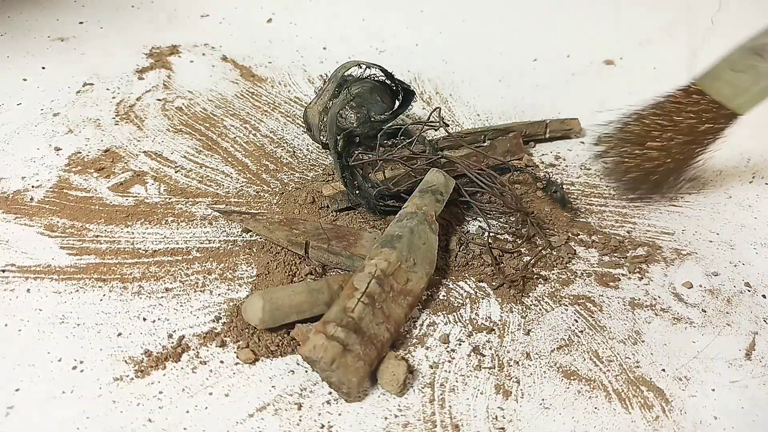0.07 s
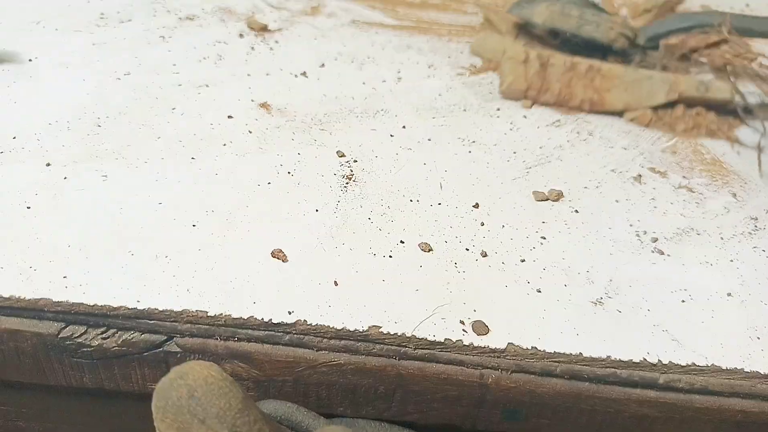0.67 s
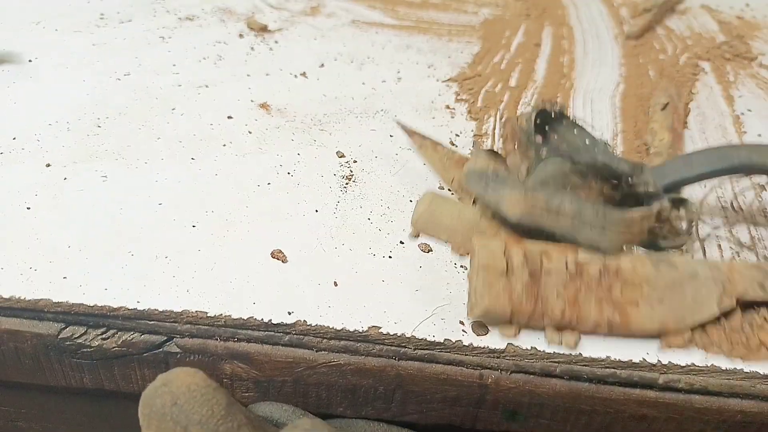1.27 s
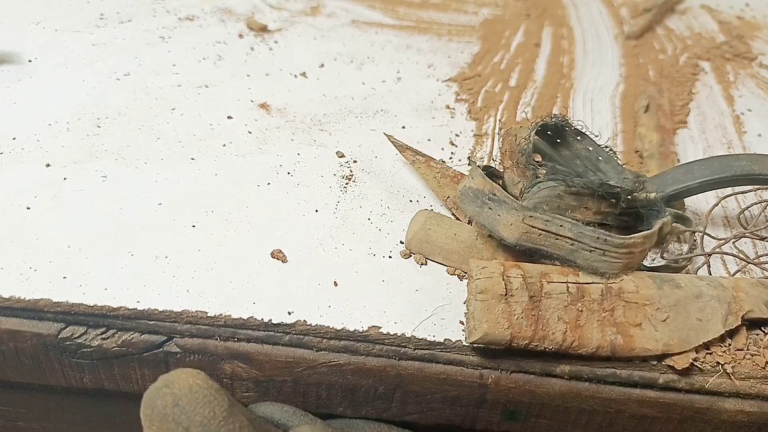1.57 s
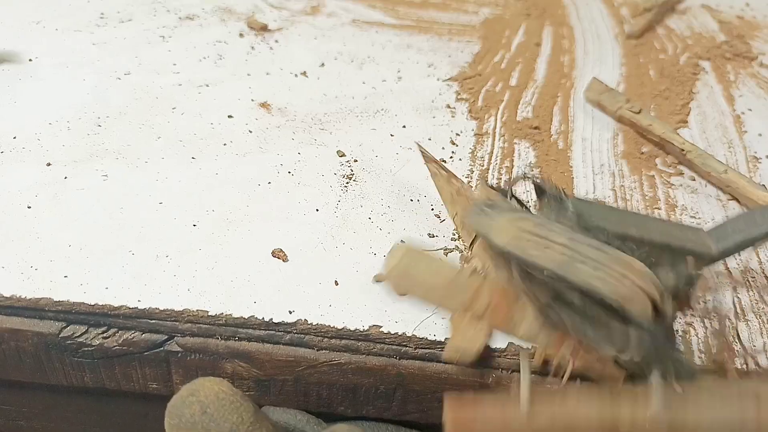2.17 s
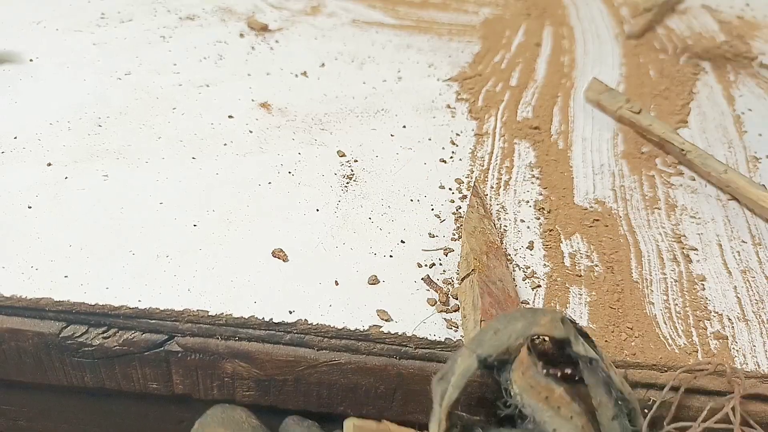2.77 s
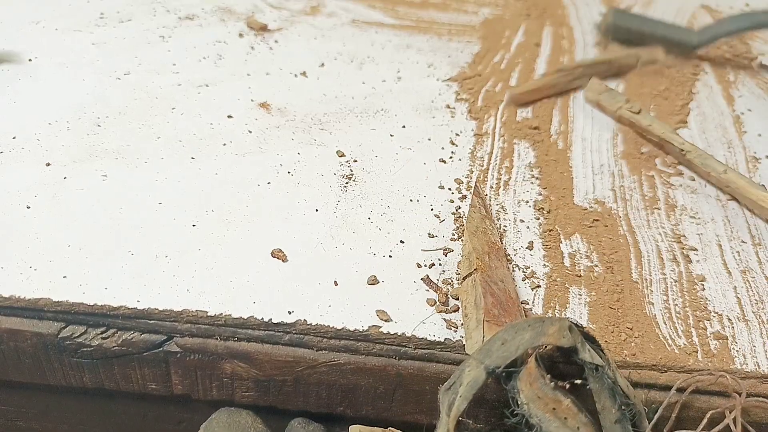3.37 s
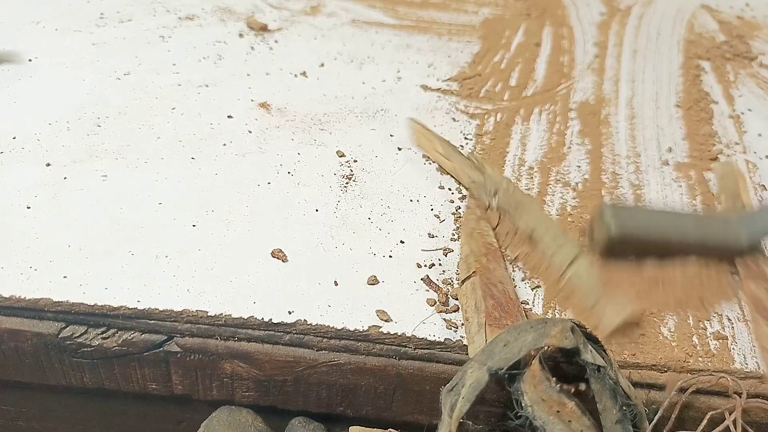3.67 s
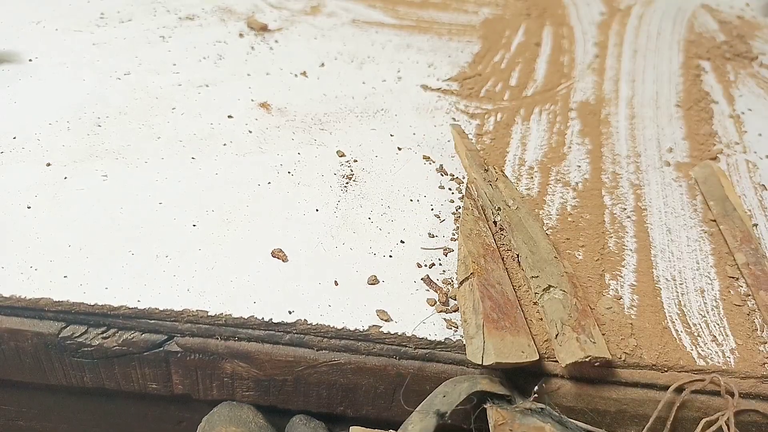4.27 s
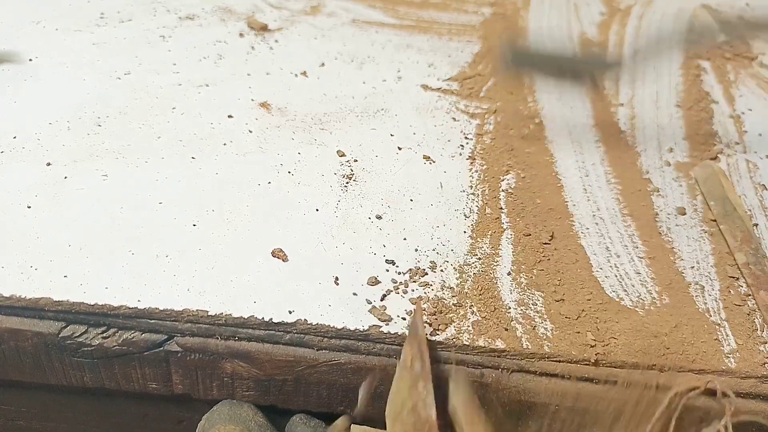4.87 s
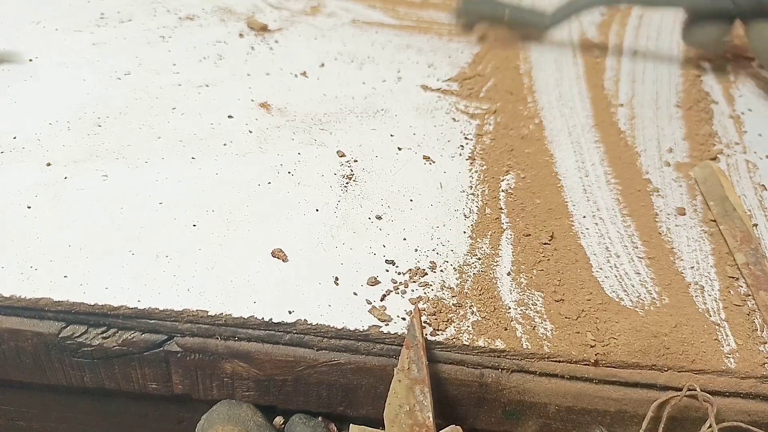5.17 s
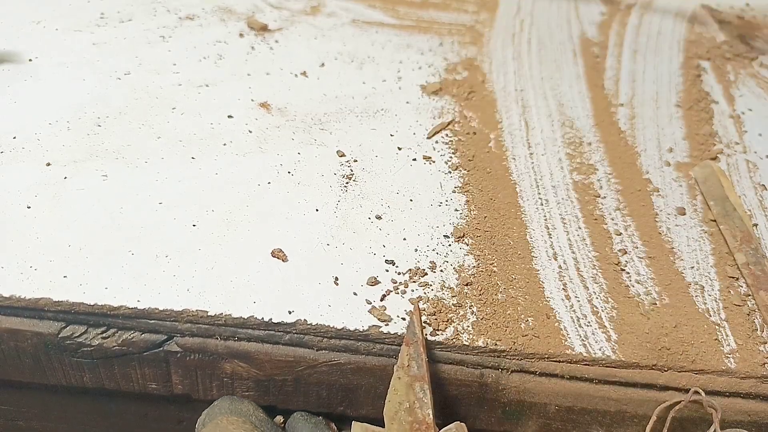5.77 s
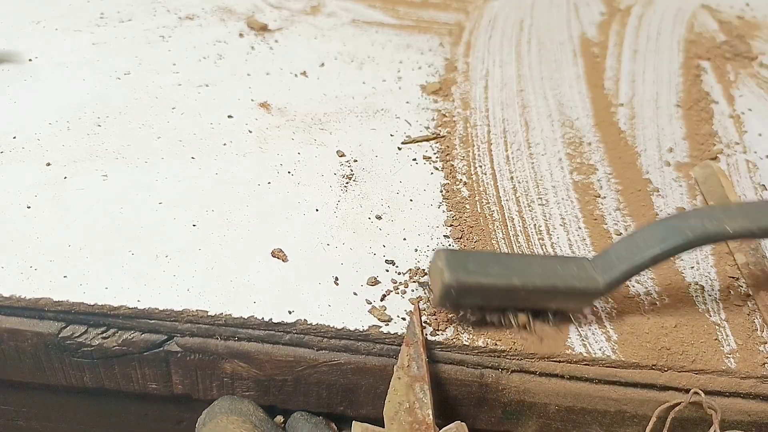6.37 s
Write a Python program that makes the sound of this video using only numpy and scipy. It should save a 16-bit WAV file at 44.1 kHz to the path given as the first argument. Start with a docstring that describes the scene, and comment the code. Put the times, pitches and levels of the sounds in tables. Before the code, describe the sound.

Close to a hard board in a quiet room, a brief dusty swish gives way to a wire brush scraping through grit and dry wood scraps. The bright, raspy strokes come in groups, with a pause where loose chips trickle faintly. The wires snap free and give short, thin squeals, while the board thuds softly. Near the end a heavy push makes it rumble, followed by a short, low juddering drone.

```python
"""A quiet room, close to a hard board. A soft brush flicks over rust dust; then a wire brush rakes grit
and wood scraps across the board in separate strokes. Grains catch and release the wires, which rasp,
snap free and sometimes squeal as they stick and slip. Loose chips scrunch and trickle. The board thuds
when bumped, rumbles under the hardest stroke and drones as the brush judders at the end."""
import sys
import numpy as np
from scipy import signal
from scipy.fft import rfft, irfft, next_fast_len
from scipy.io import wavfile
from scipy.ndimage import uniform_filter1d, map_coordinates

SR = 44100
rng = np.random.default_rng(int(sys.argv[2]) if len(sys.argv) > 2 else 0)


def int16_out(signal):
    """Quantize to a 16-bit WAV file."""
    q = np.round(np.clip(np.atleast_2d(signal).T, -1, 1) * 32767)
    wavfile.write(sys.argv[1], SR, q.astype(np.int16))


N = 287091
CONTROL_HZ = 1000

# pushes of the wire brush:
# start_s, rise_s, hold_s, fall_s, swell_db, debris_db, rasp_db, sand_db, sizzle_db, rasp_centre_hz
STROKES = [ (0.461, 0.014, 0.013, 0.035, -1.5, -55, -35.5, -48.5, -42, 6500),
           (0.486, 0.019, 0.011, 0.024, -1.5, -55, -39.5, -51, -31, 6500),
           (0.498, 0.021, 0.18, 0.11, -1, -55.5, -49, -54.5, -53, 5400),
           (0.675, 0.05, 0.16, 0.11, -1, -56.5, -56, -66, -76, 5100),
           (0.861, 0.046, 0.11, 0.094, -2, -56, -58.5, -67.5, -59, 6300),
           (1.005, 0.043, 0.33, 0.15, -5, -59, -67, -75, -75, 5170),
           (3.177, 0.11, 0.24, 0.058, 2, -59, -49.5, -53, -49.5, 6000),
           (3.367, 0.036, 0.031, 0.04, -2, -57.5, -42, -53, -52, 5950),
           (3.514, 0.043, 0.074, 0.074, 4, -57, -38.5, -51, -47, 6350),
           (3.634, 0.039, 0.11, 0.03, -3, -53.5, -43, -66.5, -63, 5860),
           (3.774, 0.021, 0.28, 0.18, -7.5, -64.5, -79, -85, -86.5, 5010),
           (4.313, 0.03, 0.18, 0.044, 4.5, -96, -79, -77, -73.5, 5800),
           (4.546, 0.053, 0.098, 0.06, 0.5, -69.5, -67, -71, -66.5, 5400),
           (4.689, 0.095, 0.022, 0.027, 0.5, -61.5, -52.5, -62.5, -72, 5140),
           (5.151, 0.075, 0.11, 0.025, 2.5, -57.5, -47, -58, -52.5, 5400),
           (5.322, 0.043, 0.14, 0.1, 2, -57, -45, -65.5, -70.5, 5460),
           (5.409, 0.028, 0.0044, 0.031, 0, -59, -43, -61, -52, 5530),
           (5.711, 0.05, 0.16, 0.046, 13, -77.5, -69, -100, -106, 4450),
           (5.884, 0.028, 0.045, 0.045, 4, -68, -51.5, -67, -38.5, 6400),
           (5.949, 0.031, 0.049, 0.05, 0, -60, -57, -54.5, -34, 6640),
           (6.01, 0.024, 0.53, 0.05, -3.5, -62, -70.5, -79, -84, 4140),
           (6.216, 0.022, 0.125, 0.025, 2, -86, -77, -101, -58.5, 4100), ]
# tone colour of dry wood chips: freq_hz, gain_db
CHIP_COLOUR = [(300, 0), (1000, -6), (1300, -17), (1650, 9.5), (2100, -4), (2450, 4.5), (3400, -13),
               (4500, -22), (6500, 1), (8000, -6), (11500, -18.5), (13500, -21), (15300, 5), (16500, -63)]


def wire_brush(squeal_gain):
    """Scraps grind along the board while grains pluck the wires and hiss under their tips."""
    # tone colours of dragged debris, fine sand and wire tips: freq_hz, gain_db
    debris_colour = [(60, -10), (130, -2), (260, 2.5), (450, 4.5), (800, -2), (1250, -2), (2000, -5),
                     (3000, -12), (4000, -23), (6000, -28)]
    sand_colour = [(4000, -30), (7500, -9), (9000, 0), (11000, -1.5), (13000, -7), (15000, -1),
                   (16500, -51)]
    sizzle_colour = [(12000, -34), (13800, -18), (14600, 2), (15300, 8.5), (15750, -6), (16300, -38)]
    # modes of the board and its wood scraps: freq_hz, width_hz, gain_db
    wood_modes = [(410, 70, 0), (700, 100, 1), (830, 120, 4), (1040, 90, -4), (2300, 160, -9),
                  (2800, 200, 0), (3300, 200, -5), (3780, 240, 2), (4700, 280, -3)]
    drag, rasping, sanding, sizzling = levels(STROKES)
    grind = shimmer(coloured(grit(4000), debris_colour), depth_db=4, size=2048)
    wood = shimmer(struck(grit(3000), wood_modes), depth_db=5.5, size=2048)
    hiss = shimmer(coloured(grit(14000), sand_colour), depth_db=4.5)
    sand = unit(hiss + .22 * wire_pings())
    sizzle = shimmer(coloured(grit(8200), sizzle_colour), depth_db=3.5)
    # wires that squeal in step no longer rasp at random
    free_wires = 1 - np.clip(.3 * squeal_gain / (rasping + 1e-9), 0, .25)
    # the scraps ring out fully only when dragged hard
    scraps = drag * np.minimum(drag / amp(-54.5), 1) * amp(1.5) * wood
    return scraps + drag * grind + rasping * free_wires * wire_rasp() + sanding * sand + sizzling * sizzle


def wire_rasp(reach_hz=850):
    """Grains pluck groups of wires; the bend of the brush decides which group rings most."""
    # wire groups, long and slack to short and stiff: pitch_hz, base_width_hz, gain_db
    wire_groups = [(3640, 810, 1), (4580, 620, 2.5), (5850, 1360, -1.5), (6220, 1540, 8.5), (7020, 410, 5)]
    *_, rasp_db, _, _, centre_hz = np.transpose(STROKES)
    # where pushes overlap, the louder one sets the centre
    weights = amp(rasp_db[:, None]) ** 2 * envelopes(STROKES)
    centre = per_sample(centre_hz @ weights / weights.sum(axis=0))
    plucks = grit(6000)
    shares, voices = [], []
    for hz, width, db in wire_groups:
        shares.append(amp(db) / (1 + ((centre - hz) / reach_hz) ** 2))
        kicks = plucks * rng.choice([-1, 1], N)
        voices.append(unit(filtered(kicks, lambda f: resonance(f, hz, 2.27 * width) ** 2)))
    wires = np.sum(np.array(shares) * voices, axis=0) / np.linalg.norm(shares, axis=0)
    # no wire is stiff enough to ring above the highest group
    return shimmer(lowpass(wires, 7600), depth_db=5, size=1024)


def wire_pings(count=1200, length_s=0.028):
    """Single wires chirp briefly as they skid over grains."""
    t = np.arange(int(length_s * SR)) / SR
    when, tone, size, glide = rng.random((4, count, 1))
    hz = 8000 * (13000 / 8000) ** tone
    phase = 2 * np.pi * hz * t * (1 + (glide - .5) * t / 2)
    chirps = amp(12 * size) * np.hanning(len(t)) * np.sin(phase)
    index = (when * N).astype(int) + np.arange(len(t))
    return unit(np.bincount(index.ravel(), chirps.ravel(), N)[:N])


def squeal_curves():
    """Each squeal swells and fades in one arch while it glides: pitch, gain and octave gain."""
    # wires and scraps sticking and slipping in step:
    # start_s, length_s, pitch_hz, glide_hz, level_db, octave_db
    slips = [ (0.726, 0.057, 3900, -48.5, -49.5, -76), (0.88, 0.053, 6454, -62.5, -52, -72),
             (1.005, 0.046, 6240, -40.5, -46, -73), (3.33, 0.086, 6216, -59.5, -46, -60),
             (3.68, 0.034, 6990, 62.5, -40, -67), (3.729, 0.064, 4950, 81, -46.5, -76),
             (3.927, 0.073, 1000, 41, -64, -82), (5.212, 0.072, 5714, 20, -44.5, -56),
             (5.288, 0.066, 4840, -420, -41.5, -48.5), (5.914, 0.084, 6740, 58.5, -40.5, -62),
             (6.021, 0.028, 5850, -62, -48.5, -52), ]
    start, length, hz, glide_hz, db, octave_db = np.transpose(slips)[:, :, None]
    progress = np.clip((np.arange(N) / SR - start) / length, 0, 1)
    arch = 4 * progress * (1 - progress) + 1e-9
    pitch = np.average(hz + glide_hz * (progress - .5), weights=arch, axis=0)
    return pitch, np.sum(amp(db) * arch, axis=0), np.sum(amp(octave_db) * arch, axis=0)


def squeals(pitch, gain, octave_gain, flutter_hz=280):
    """A tuft of wires slips at nearly one pitch: a fuzzy whistle, with an octave when it bites hard."""
    def tuft(angle):
        # friction limits the swing, so the whistle flutters without sharp peaks
        cos_swing, sin_swing = np.tanh([wobble(flutter_hz), wobble(flutter_hz)])
        return unit(cos_swing * np.cos(angle) + sin_swing * np.sin(angle))

    phase = 2 * np.pi * np.cumsum(pitch + 60 * wobble(120)) / SR
    octave = lowpass(tuft(2 * phase), 12000)  # the wires damp the highest octaves
    return gain * tuft(phase) + octave_gain * octave


def snaps(t60_s=.028, attack_s=.002, crackle_trim_db=-22.5, knock_trim_db=-18):
    """Crumbs crack and wires snap free: a brief crackle of grit over a duller knock of wood."""
    # snaps, ahead of the trims: start_s, level_db, knock_offset_db
    hits = [(0.387, -29, -7), (0.403, -19.5, -2.5), (0.434, -19, -24), (1.8161, -55, -7),
            (1.9898, -52.5, -20), (2.409, -55.5, 5), (2.6429, -53.5, 1), (2.868, -47.5, -24),
            (3.143, -27.5, -16), (4.3376, -46, -10), (4.478, -38, -29), (4.9687, -45, 1),
            (5.096, -27.5, -16), (5.1526, -27, -20), (5.8595, -39, -25), (6.236, -45, -9)]
    # bright tone colour of the crackle: freq_hz, gain_db
    snap_colour = [(1000, -18.5), (3000, -16), (6500, 7.5), (8000, -7), (10000, 2.5), (13000, -3.5),
                   (15400, 10), (16500, -39.5)]
    t = np.arange(SR // 10) / SR
    shape = amp(-60 * t / t60_s) * (1 - np.exp(-t / attack_s))
    shape /= shape.max()
    crackles, knocks = np.zeros((2, N + SR))
    for start, db, offset_db in hits:
        span = slice(round(start * SR), round(start * SR) + len(t))
        crackles[span] += amp(db + crackle_trim_db) * shape * rng.standard_normal(len(t))
        knocks[span] += amp(db + offset_db + knock_trim_db) * shape * rng.standard_normal(len(t))
    return coloured(crackles[:N], snap_colour) + coloured(knocks[:N], CHIP_COLOUR)


def board(slip_hz=134):
    """The hardest stroke shakes the board; regular slipping makes it drone on one low mode."""
    # shake under the hardest stroke: time_s, level_db
    shake_curve = [(5.14, -69), (5.186, -44.5), (5.312, -41), (5.352, -29), (5.412, -37), (5.462, -23.5),
                   (5.538, -35), (5.56, -34), (5.66, -76)]
    # tone colour of the rumbling board: freq_hz, gain_db
    rumble_colour = [(15, -33), (35, -8.5), (62, -4.5), (102, 3.5), (150, -3), (210, -9.5), (275, -17),
                     (320, -28), (460, -40.5), (600, -35), (1200, -75)]
    # the brush juddering: start_s, rise_s, hold_s, fall_s, swell_db, level_db
    judder = [(6.16, 0.085, 0.27, 0.05, 4.5, -42.5)]
    shake = amp(np.interp(np.arange(N) / SR, *np.transpose(shake_curve), left=-120, right=-120))
    phase = 2 * np.pi * np.cumsum(slip_hz + 1.36 * wobble(25.6)) / SR
    drone = np.sqrt(2) * np.sin(phase) * amp(0.42 * wobble(30))
    # grit under the juddering wires roughens the drone
    grind = unit(filtered(grit(1500), lambda f: resonance(f, hz=120, width=380) ** 2))
    return rumble(shake, rumble_colour) + levels(judder)[0] * (drone + amp(-19) * grind)


def thuds(attack_s=0.014, tremble_db=-15.5):
    """Single bumps and the tremble of dragged debris sway the table."""
    # the brush bumping the board: start_s, level_db, t60_s
    bumps = [(0.463, -38, 0.19), (1.152, -44.5, 0.091), (2.249, -55, 0.25), (2.31, -61, 0.24),
             (3.215, -49.5, 0.18), (3.335, -50.5, 0.28), (5.985, -50.5, 0.2), (6.064, -50, 0.2)]
    # tone colour of the swaying table: freq_hz, gain_db
    thud_colour = [(15, -6.5), (35, -3), (65, -4), (110, 4), (170, -8.5), (300, -23), (600, -43.5)]
    start, db, t60 = np.transpose(bumps)[:, :, None]
    age = np.clip(np.arange(N) / SR - start, 0, 1)
    knocks = np.sum(np.minimum(age / attack_s, 1) * amp(db - 60 * age / t60), axis=0)
    drag = levels(STROKES)[0]
    return rumble(knocks + amp(tremble_db) * drag, thud_colour)


def rumble(gain, colour):
    """Dense little bumps of the brush blur into a rumble that follows the gain curve."""
    bumps = coloured(grit(500, spread_db=0.5, clump_db=0.5), colour)
    # the hand keeps the pressure even from bump to bump
    local_rms = np.sqrt(np.abs(uniform_filter1d(bumps ** 2, size=1500)) + 1e-6)
    return gain * bumps / local_rms


def soft_brush():
    """Hair bristles swish through dust and excite the ferrule."""
    # the opening flick: start_s, rise_s, hold_s, fall_s, swell_db, level_db
    flick = [(-0.028, 0.03, 0.095, 0.055, 3.5, -43)]
    # tone colour of bristles in dust: freq_hz, gain_db
    bristle_colour = [(70, -17), (130, -2), (300, -3), (620, -6), (880, -13), (1250, -10.5), (1700, -8),
                      (2300, -9.5), (3200, -6.5), (4200, -9), (5100, -10.5), (6400, -3.5), (8000, -8.5),
                      (13300, -6.5), (15300, 2), (16500, -27)]
    # modes of the ferrule and handle: freq_hz, width_hz, gain_db
    ferrule_modes = [(935, 33, -12), (2180, 135, -4), (6050, 250, -9.5)]
    dust = shimmer(coloured(grit(9000), bristle_colour), depth_db=4.5, size=1024)
    ferrule = struck(grit(5000), ferrule_modes)
    push, = levels(flick)
    pressed = np.minimum(push / amp(-42), 1)  # the ferrule rings only under pressure
    return push * (dust + amp(-2.5) * pressed * ferrule)


def chips():
    """Loose chips scrunch as the wire brush lands, and trickle as the heap creeps over the edge."""
    # the shove and the creeping heap: start_s, rise_s, hold_s, fall_s, swell_db, level_db
    shove = [(0.373, 0.01, 0.069, 0.016, 6.5, -54.5)]
    creep = [(1.912, 0.012, 0.02, 0.0078, -3, -67), (2.03, 0.07, 0.048, 0.08, -0.5, -78.5),
             (2.22, 0.08, 0.038, 0.05, 1, -72), (2.39, 0.03, 0.22, 0.1, -2.5, -80),
             (4.87, 0.025, 0.03, 0.03, 3, -72.5)]
    # tone colour of falling crumbs: freq_hz, gain_db
    crumb_colour = [(800, -13.5), (2500, 7.5), (3800, 0), (6500, 3), (8000, -9.5), (10000, -3.5),
                    (13000, -29), (15300, 1), (16500, -41)]
    scrunch = unit(coloured(grit(4000), CHIP_COLOUR))
    trickle = shimmer(coloured(grit(1900), crumb_colour), depth_db=6.5)
    return levels(shove)[0] * scrunch + levels(creep)[0] * trickle


def walls(x, t60_s=0.042, wet_db=-18):
    """A short diffuse reflection from the walls."""
    t = np.arange(SR // 3) / SR
    tail = rng.standard_normal(len(t)) * amp(-60 * t / t60_s)
    return amp(wet_db) * signal.fftconvolve(x, tail / np.linalg.norm(tail))[:N]


def room_tone(level_db=-65):
    """Dull, nearly steady air of the room."""
    # tone colour of the air: freq_hz, gain_db
    air_colour = [(15, -30), (35, -7), (125, -3), (210, -5), (400, 0), (730, -12), (970, -6), (1300, -12),
                  (2300, -17), (4000, -25), (6300, -28), (8500, -38), (13400, -41), (15500, -33)]
    noise = filtered(rng.standard_normal(N), lambda hz: colour_gain(air_colour, hz))
    air = shimmer(noise, depth_db=4, size=2048)
    return amp(level_db + 0.31 * wobble(2.5)) * air


def grit(per_second, spread_db=3.2, clump_db=1.4):
    """Tiny impacts of grains: random times, uneven sizes, louder in clumps."""
    hits = rng.random(N) < per_second / SR
    sizes = amp(spread_db * np.clip(rng.standard_normal(N), -2, 2)) * rng.choice([-1, 1], N)
    clumps = amp(clump_db * (wobble(260) + 1.68 * wobble(35)))
    return unit(hits * sizes * clumps)


def shimmer(x, depth_db, size=512):
    """Narrow resonances come and go, as when contacts touch down and lift off."""
    spectrum = signal.stft(x, nperseg=size)[2]
    field = uniform_filter1d(rng.standard_normal(spectrum.shape), size=3, axis=0)
    field = uniform_filter1d(field, size=6, axis=1)
    return unit(signal.istft(spectrum * amp(depth_db * unit(field)), nperseg=size)[1][:N])


def envelopes(pushes, edge_db=20, edge_curve=1.3):
    """Power of each push: it rises, swells or sags while held, then drops ever faster as contact lifts."""
    start, rise, hold, fall, swell_db = np.transpose(pushes)[:5, :, None]
    held = np.arange(0, N / SR, 1 / CONTROL_HZ) - start - rise
    outside = np.clip(np.maximum(-held / rise, (held - hold) / fall), 0, 6)
    return amp(swell_db * np.clip(held / hold, 0, 1) - edge_db * outside ** edge_curve) ** 2


def levels(pushes):
    """Gain over time for each level column of a table of pushes."""
    powers = amp(np.transpose(pushes)[5:9]) ** 2 @ envelopes(pushes)
    return [per_sample(np.sqrt(power)) for power in powers]


def coloured(x, colour, size=8192):
    """x rung through a minimum-phase body with the given tone colour."""
    cepstrum = irfft(np.log(colour_gain(colour, np.fft.rfftfreq(size, 1 / SR))))
    cepstrum[1:size // 2] *= 2
    cepstrum[size // 2 + 1:] = 0
    response = irfft(np.exp(rfft(cepstrum)))
    return signal.fftconvolve(x, response / np.linalg.norm(response))[:N]


def struck(x, modes):
    """x rung through a few modes of alternating polarity, at rms 1."""
    def body(f):
        return sum((-1) ** k * amp(db) * resonance(f, hz, width) for k, (hz, width, db) in enumerate(modes))
    return unit(filtered(x, body))


def resonance(f, hz, width):
    """Causal response of one mode."""
    return 1j * f * width / (hz * hz - f * f + 1j * f * width)


def filtered(x, response):
    """x shaped by a frequency response."""
    size = next_fast_len(N + SR // 4)
    return irfft(rfft(x, size) * response(np.fft.rfftfreq(size, 1 / SR)), size)[:N]


def lowpass(x, cutoff_hz):
    """A steep treble cut."""
    return filtered(x, lambda hz: 1 / (1 + (hz / cutoff_hz) ** 20))


def colour_gain(colour, hz):
    """Gain of a tone colour, read on a log frequency axis."""
    freq_hz, gain_db = np.transpose(colour)
    return amp(np.interp(np.log(hz + 1), np.log(freq_hz + 1), gain_db))


def wobble(rate):
    """A smooth random curve, rate knots a second."""
    return map_coordinates(rng.standard_normal(int(N * rate / SR) + 4), [np.arange(N) * rate / SR])


def per_sample(control):
    """A control curve filled in to audio rate."""
    return np.interp(np.arange(N) * CONTROL_HZ / SR, np.arange(len(control)), control)


def amp(db):
    """Decibels to gain."""
    return 10 ** (np.asarray(db) / 20)


def unit(x):
    """x at rms 1."""
    return x / np.sqrt(np.mean(x ** 2) + 1e-20)


def scene():
    """All the brushing, close by, over the room's air."""
    pitch, squeal_gain, octave_gain = squeal_curves()
    brushing = soft_brush() + chips() + wire_brush(squeal_gain) + squeals(pitch, squeal_gain, octave_gain)
    direct = brushing + snaps() + thuds() + board()
    return (direct + walls(direct) + room_tone())[None]


def record(dry, top_hz=15800):
    """A brick-wall cut takes off the very top of the treble."""
    return np.array([filtered(x, lambda hz: hz < top_hz) for x in dry])


dry = scene()
out = record(dry)
int16_out(out)
```